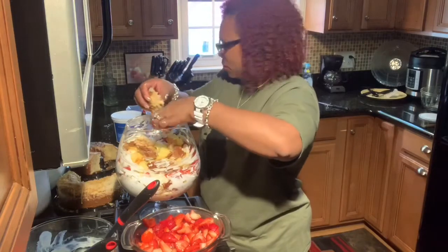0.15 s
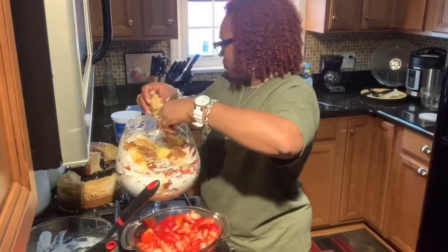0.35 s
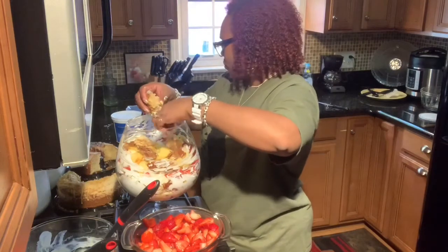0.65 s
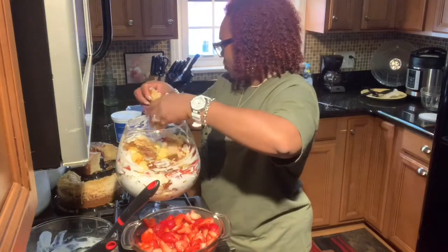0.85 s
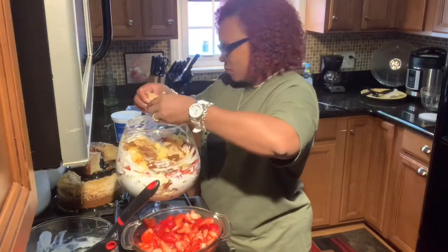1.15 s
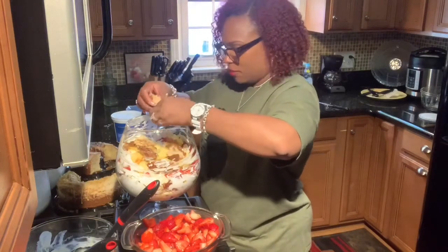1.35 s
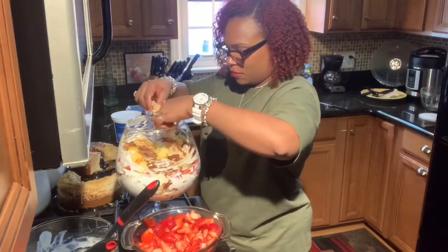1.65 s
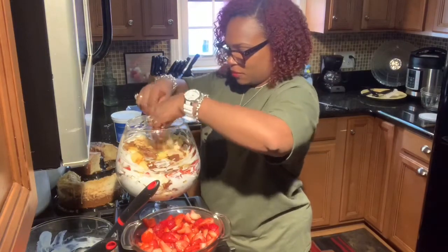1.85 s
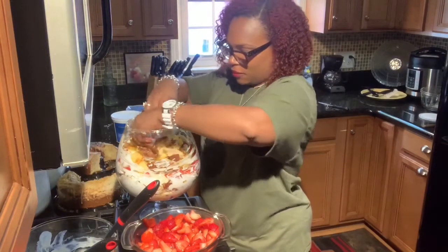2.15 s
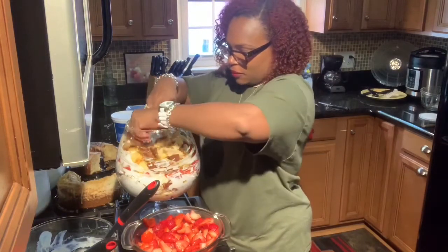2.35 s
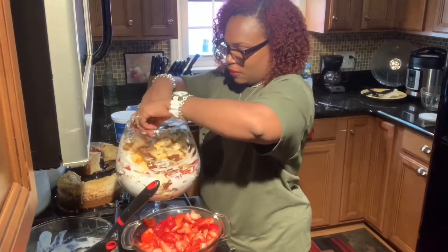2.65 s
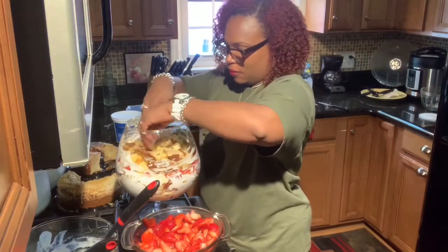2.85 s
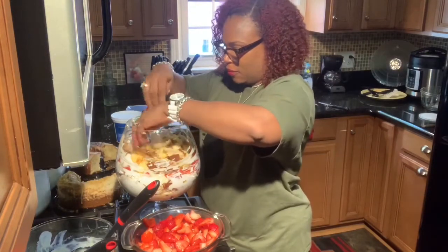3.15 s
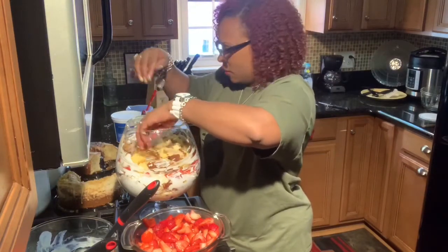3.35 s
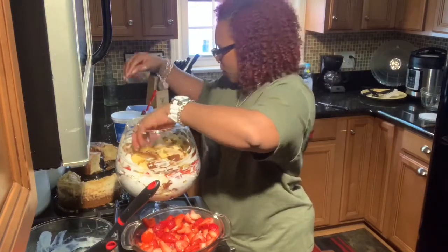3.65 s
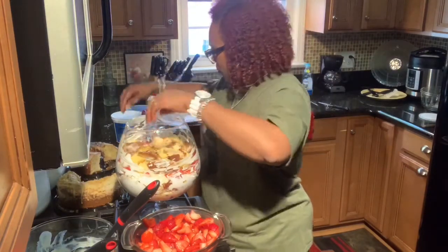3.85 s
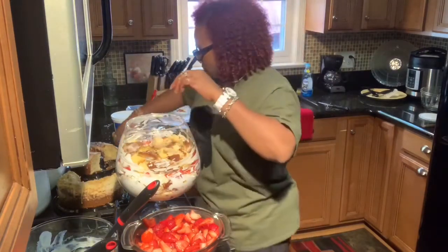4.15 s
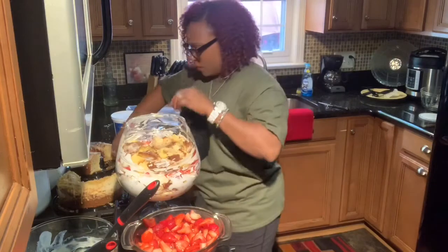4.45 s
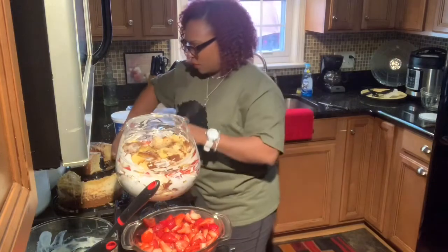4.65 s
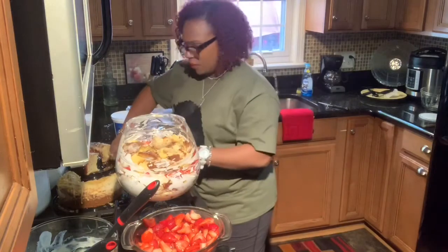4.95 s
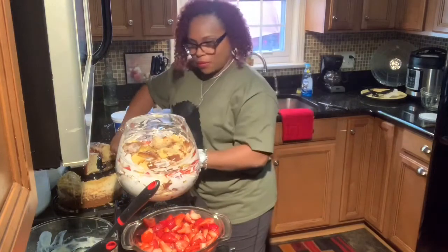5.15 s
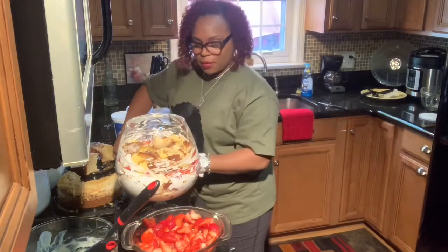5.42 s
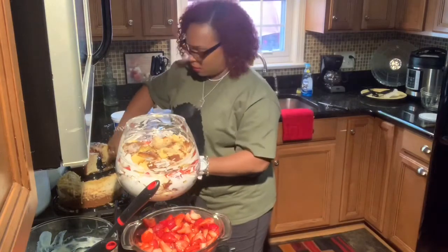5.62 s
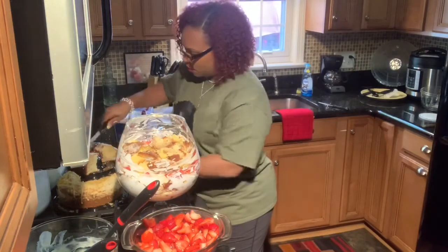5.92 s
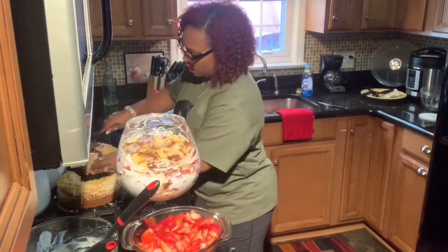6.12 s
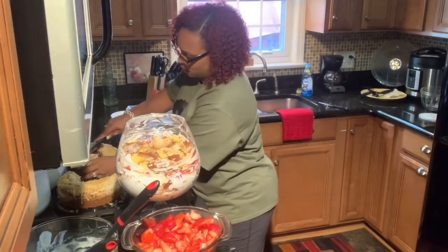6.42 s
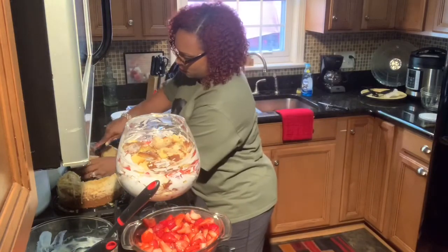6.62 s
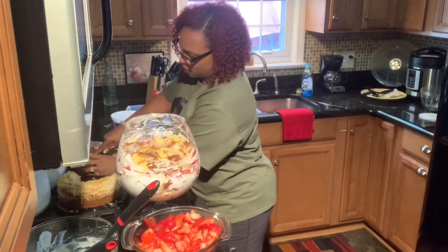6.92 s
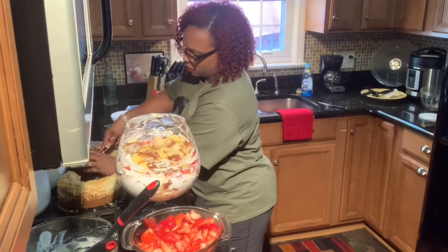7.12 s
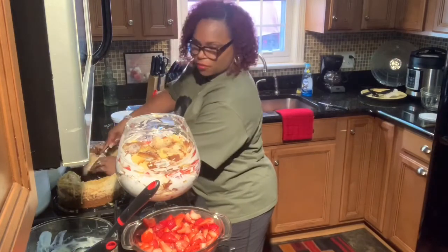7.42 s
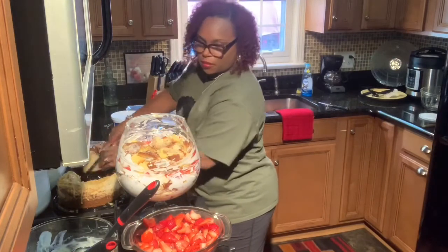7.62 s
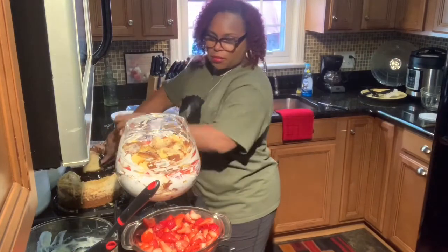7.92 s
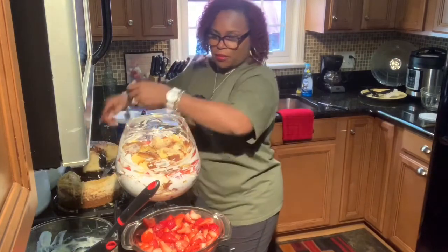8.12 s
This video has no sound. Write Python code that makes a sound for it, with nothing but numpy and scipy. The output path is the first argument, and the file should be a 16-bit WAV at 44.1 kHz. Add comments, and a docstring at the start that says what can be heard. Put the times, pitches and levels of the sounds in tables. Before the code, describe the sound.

In a small home kitchen, bracelet charms tinkle while hands crumble cake, followed by glassy clinks and firmer dish knocks above low fridge hum.

```python
"""Cake crumbled beside a jingling bracelet

Metal charms of a bracelet jingle as decaying sines over scuffs of noise, with a thin clasp tone beside them.
A utensil clinks on a glass bowl, then knocks on a cake dish and counter: filtered bursts excite ringing modes.
Cake, cloth and blade rub as grainy noise; chain and sleeve rustle faintly later on.
A refrigerator hums and rumbles on the right, under a dull room tone and a faint hiss."""
import sys
import numpy as np
from scipy import signal
from scipy.fft import rfft, irfft, next_fast_len
from scipy.io import wavfile

SR = 44100
rng = np.random.default_rng(int(sys.argv[2]) if len(sys.argv) > 2 else 0)


def output_pcm(signal):
    """Save a mono or channel-first signal as 16-bit PCM at the path in sys.argv[1].

    Samples are clipped to [-1, 1] before scaling.
    """
    pcm = np.clip(np.atleast_2d(signal).T, -1, 1) * 32767
    wavfile.write(sys.argv[1], SR, np.round(pcm).astype(np.int16))


N = 365148
TIME = np.arange(N) / SR
RING_TIME = TIME[:SR // 3]   # how long a hit is followed
EDGES = np.geomspace(90, 17000, 19)   # edges of the noise bands, Hz


def from_db(db):
    """Logarithmic level: decibels become an amplitude ratio."""
    return 10 ** (np.asarray(db) / 20)


def rms_one(x):
    """Power normalization: scale to rms 1."""
    return x / np.sqrt(np.mean(x ** 2) + 1e-20)


def early_level(x, size=882):
    """Onset energy: rms of the first samples of a stereo sound."""
    return np.sqrt(np.mean(x[..., :size] ** 2, axis=(0, -1), keepdims=True) + 1e-20)


def at_hz(points, hz):
    """Logarithmic pitch: interpolate a table on a log-frequency axis."""
    points = np.array(points)
    return np.interp(np.log(np.maximum(hz, 1)), np.log(points[:, 0]), points[:, 1])


def add(track, s, sound):
    """Superposition: mix a sound into a track at a time in seconds."""
    i = max(0, round(s * SR))
    track[..., i:i + sound.shape[-1]] += sound[..., :N - i]


def band(x, low, high, order=2):
    """Resonant selection: causal Butterworth band-pass."""
    sos = signal.butter(order, [low, min(high, .48 * SR)], "band", fs=SR, output="sos")
    return signal.sosfilt(sos, x)


def fade(t, t60):
    """Exponential damping: amplitude falls 60 dB in t60 seconds."""
    return np.exp(-np.log(1000) * t / t60)


def onset(t, rise_s):
    """Exponential build-up: amplitude approaches 1 with time constant rise_s."""
    return 1 - np.exp(-t / rise_s)


def drift(rate):
    """Random modulation: line segments between Gaussian knots, rate knots per second."""
    knots = rng.standard_normal(int(N / SR * rate) + 2)
    return np.interp(TIME * rate, np.arange(len(knots)), knots)


def flutter(count, size, rate):
    """Independent random modulation: rows of line segments, rate knots per second."""
    steps = np.arange(size) / SR * rate
    knots = rng.standard_normal((count, int(steps[-1]) + 2))
    return np.array([np.interp(steps, np.arange(len(row)), row) for row in knots])


def sparse_impulses(per_s):
    """Poisson-like events: random impulses with exponential strengths, capped at 3."""
    return (rng.random(N) < per_s / SR) * np.minimum(rng.exponential(1, N), 3)


def pair(white, alike):
    """Interaural coherence: mix two unrelated noises to a left and right of given likeness."""
    alike = np.clip(alike, 0, 1)
    mid = np.sqrt((1 + alike) / 2) * white[0]
    side = np.sqrt((1 - alike) / 2) * white[1]
    return np.array([mid + side, mid - side])


# left-right likeness of diffuse sound: (frequency [Hz], coherence [0 to 1])
LIKENESS = [(100, .98), (250, .92), (600, .65), (1500, .3), (4500, .3), (7000, .8), (8500, .99)]


def coloured(spectrum):
    """Spectral shaping: steady stereo noise of rms 1, weighted by a (frequency [Hz], level [dB]) table."""
    size = next_fast_len(N)
    hz = np.arange(size // 2 + 1) * SR / size
    white = rfft(rng.standard_normal((2, size)))
    shaped = pair(white, at_hz(LIKENESS, hz)) * from_db(at_hz(spectrum, hz))
    return rms_one(irfft(shaped, size)[:, :N])


# reverberation of the kitchen: (frequency [Hz], t60 [s])
ROOM_T60 = [(100, 0.17), (600, 0.33), (2000, 0.34), (6000, 0.26), (14000, 0.16)]


def kitchen(x, gap_s=0.0086):
    """Diffuse reverberation: reflections from cabinets and tiles, with a decay time for each band."""
    t, echo = RING_TIME, 0
    for low, high in zip(EDGES, EDGES[1:]):
        hz = np.sqrt(low * high)
        noise = pair(rng.standard_normal((2, len(t))), at_hz(LIKENESS, hz))
        echo = echo + band(noise * fade(t, at_hz(ROOM_T60, hz)) * (t > gap_s), low, high)
    echo = echo / np.sqrt(np.sum(echo ** 2) / 2)
    return signal.fftconvolve(x[None], echo, axes=1)[:, :N]


def rattling_tone(hz, t, rattle_per_s=220, wobble_rad=.55):
    """Phase modulation: a piece rattling on its link blurs its spectral line."""
    wobble = wobble_rad * flutter(count=1, size=len(t), rate=rattle_per_s)[0]
    return np.sin(2 * np.pi * hz * t + wobble)


# touches of the charms: (time [s], then relative levels [dB] of flat charm, long charm, small charm,
# link and contact scuff)
JINGLES = [(0.002, -61.5, -75, -68, -87, -74), (0.309, -37, -64, -88, -78, -59.5),
           (0.318, -40.5, -72, -78, -85, -68), (0.432, -51, -61, -70, -52, -75.5),
           (0.744, -64, -71, -83, -71, -69), (1.103, -65, -67.5, -65, -70, -75),
           (1.128, -49, -65, -73, -69, -67), (1.464, -54, -55, -66, -79, -72.5),
           (1.579, -50, -75, -73, -75, -69.5), (1.846, -49, -54, -67, -57, -65.5),
           (2.028, -67, -88.5, -93, -94, -86), (3.302, -40, -65, -88, -81, -62.5),
           (3.446, -53, -81, -60, -93, -72.5), (3.63, -60, -96, -83, -90, -75.5),
           (4.184, -50, -62, -86, -59, -65.5), (4.478, -52, -69, -48, -98, -67),
           (4.65, -76, -75, -62, -71, -72), (4.747, -66, -73, -76, -67, -72.5),
           (5.009, -76.5, -81, -85, -75, -100), (5.276, -54, -74, -69, -53, -81),
           (5.438, -79, -74, -55, -77, -74), (5.641, -56, -51, -88, -77, -56.5),
           (5.66, -49, -52, -88, -62, -61), (5.846, -88, -97, -68, -83, -83),
           (5.887, -70, -86, -59, -72, -80), (5.917, -57, -62.5, -47, -67, -71.5),
           (6.01, -66.5, -86, -60, -79, -72.5), (6.077, -57, -76, -65, -82, -81),
           (6.126, -53.5, -62.5, -54, -61, -68.5), (6.281, -66.5, -82, -66, -94, -79),
           (6.541, -65, -74, -61, -70, -69), (6.61, -63, -77, -65, -57, -71),
           (6.737, -60, -71, -55, -88, -67.5), (6.942, -64.5, -71, -69, -58, -70),
           (7.268, -54.5, -68, -59, -65, -69), (7.797, -58, -81, -78, -84, -57),
           (8.115, -84, -92, -72, -69, -82), (8.221, -85, -89, -63, -91, -76)]
# modes of each piece of the bracelet: (frequency [Hz], relative level [dB], t60 [s])
FLAT_CHARM = [(3946, -31, .08), (6950, -7, .06), (7002, -.5, .1), (8545, -8, .07), (14250, -4.5, .11)]
LONG_CHARM = [(3965, -17, .07), (4059, -15, .085), (9685, 0, .24)]
SMALL_CHARM = [(6790, -15, .1), (8300, -11, .07), (8530, -7, .07), (14490, -1, .12), (14680, -7, .09)]
LINK = [(15638, 0, .2)]
# bands of the contact noise, Hz
SCUFF_HZ, CLICK_HZ, TICK_HZ = (3600, 6500), (1300, 3600), (8000, 13500)
WRIST_PLACES = 6   # the moving wrist meets different reflections from touch to touch


def bracelet(ring_db=9.0, room_db=-3.0, vary_db=0.5, rise_s=0.0005, chatter_db=-13.0,
             scuff_db=16.0, click_db=12.5, tick_db=16.5, contact_t60=0.077):
    """Modal ringing: each touch excites damped sines and contact noise, then one soft bounce."""
    places, t = np.zeros((WRIST_PLACES, N)), RING_TIME
    pieces = (FLAT_CHARM, LONG_CHARM, SMALL_CHARM, LINK)
    for k, (s, *levels_db, contact_db) in enumerate(JINGLES):
        clink = 0
        for level_db, modes in zip(levels_db, pieces):
            for hz, mode_db, t60 in modes:
                gain = from_db(level_db + mode_db + ring_db + vary_db * rng.standard_normal())
                clink = clink + gain * fade(t, t60) * rattling_tone(hz, t)
        contact = from_db(contact_db) * rng.standard_normal(len(t)) * fade(t, contact_t60)
        clink = clink + from_db(scuff_db) * band(contact, *SCUFF_HZ, order=3)
        clink = clink + from_db(click_db) * band(contact, *CLICK_HZ)
        clink = clink + from_db(tick_db) * band(contact, *TICK_HZ)
        clink = clink * onset(t, rise_s)
        place = places[k % WRIST_PLACES]
        add(place, s, clink)
        add(place, s + rng.uniform(0.0074, 0.026), from_db(chatter_db) * clink)
    return sum(place + from_db(room_db) * kitchen(place) for place in places)


# ringing of the swinging clasp: (time [s], relative level [dB], t60 [s])
CLASP_RINGS = [(0.432, -69, .17), (1.13, -67, .14), (1.846, -69, .2), (4.205, -61.5, 0.66),
               (4.48, -71, 0.62), (4.83, -73, 0.73), (5.45, -62.5, 0.16), (5.661, -51, .19),
               (5.95, -71, 0.18), (6.13, -48, 0.14), (6.96, -65, .3), (7.28, -64, 0.21)]
CLASP_HZ = 4735


def clasp(level_db=1.5, room_db=-6.0, rise_s=.004):
    """Single-mode resonance: one thin, glassy tone wavers as the clasp swings."""
    out, t = np.zeros(N), TIME[:SR]
    for s, db, t60 in CLASP_RINGS:
        envelope = fade(t, t60) * onset(t, rise_s)
        add(out, s, from_db(db + level_db) * envelope * rattling_tone(CLASP_HZ, t))
    return out + from_db(room_db) * kitchen(out)


# colour shared by all blows: (frequency [Hz], relative level [dB])
BLOW_COLOUR = [(110, 2.5), (170, 5), (300, 0.5), (600, 0.5), (1000, -5), (2200, -1.83), (4500, -4.5),
               (11500, -3)]
BASS_CORNER_HZ = 1140   # a blow of zero heft thins out below this
BASS_SLOPE_DB, TREBLE_SLOPE_DB = 11, 20   # fall per octave beyond the two corners


def blow_db(blows, hz, per_hz):
    """Contact spectrum: heft extends the bass, a short contact extends the treble; per_hz tilts the level."""
    _, strength_db, heft, contact_ms = np.transpose(blows)[:4]
    bass_hz = BASS_CORNER_HZ / 2 ** heft
    treble_hz = 1000 / np.maximum(contact_ms, .02)
    # smooth count of octaves beyond each corner
    below, above = np.log2(1 + np.array([bass_hz / hz, hz / treble_hz]) ** 4) / 4
    level_db = strength_db + at_hz(BLOW_COLOUR, hz) - per_hz * 10 * np.log10(hz)
    return level_db - BASS_SLOPE_DB * below - TREBLE_SLOPE_DB * above


# decay of the struck things: (frequency [Hz], t60 [s])
BODY_T60 = [(100, 0.057), (600, 0.11), (2000, 0.18), (6000, 0.0042), (14000, 0.01054)]
CRACK_T60_S, REBOUND_DB = .025, 2.0   # first crack of a hard contact; unevenness of the rebounds


def knocks(blows, level_db, room_db, rise_s, crack_db):
    """Statistical modal density: crowded short-lived modes sound as noise bands, each with its own decay."""
    t, sounds = RING_TIME, 0
    white = rng.standard_normal((len(blows), 2, 2, len(t))).transpose(1, 2, 0, 3)
    # rebounds and early echoes
    white = white * from_db(REBOUND_DB * flutter(count=len(blows), size=len(t), rate=290))
    for k, (low, high) in enumerate(zip(EDGES, EDGES[1:])):
        hz = np.sqrt(low * high)
        body = fade(t, at_hz(BODY_T60, hz))
        room = from_db(room_db) * fade(t, at_hz(ROOM_T60, hz))
        dying = np.hypot(body, room) + from_db(crack_db) * fade(t, CRACK_T60_S)
        noise = pair(white[k % 2], at_hz(LIKENESS, hz))
        shake = band(noise * dying * onset(t, rise_s), low, high)
        gain = from_db(blow_db(blows, hz, 0.99) + level_db) * np.sqrt(high - low)
        sounds = sounds + shake * (gain[:, None] / early_level(shake))
    out = np.zeros((2, N))
    for k, row in enumerate(blows):
        add(out, row[0], sounds[:, k])
    return band(out, 103, 14000)


def ring_modes(blows, modes, level_db, vary_db, room_db):
    """Modal synthesis: blows ring clear damped sines, with a random strength and sign every time."""
    out, t = np.zeros(N), RING_TIME
    chance = rng.standard_normal((len(blows), len(modes), 2))
    rings = np.array([fade(t, t60) * np.sin(2 * np.pi * hz * t) for hz, _, t60 in modes])
    strengths_db = np.transpose([blow_db(blows, hz, 0) + mode_db for hz, mode_db, _ in modes])
    gains = from_db(strengths_db + level_db + vary_db * chance[..., 0]) * np.sign(chance[..., 1])
    for row, gain in zip(blows, gains):
        add(out, row[0], gain @ rings)
    return out + from_db(room_db) * kitchen(out)


# utensil on glass bowl: (time [s], relative strength [dB], heft [octaves of bass], contact time [ms])
BOWL_CLINKS = [(2.109, -44.5, 0.06, 0.096), (2.117, -32.5, -1, 0.31), (2.188, -28.5, -1.21, 0.098),
               (2.322, -44, -2, 0.031)]
# bowl modes, in close pairs and clusters: (frequency [Hz], relative level [dB], t60 [s])
BOWL = [(1211, -3, .2), (1935, -3, .12), (1975, -5, .11), (2640, -5, .14), (2760, -14, .11),
        (3020, -11, .15), (3431, -8, .11), (3560, -9, .15), (3601, -6.5, .14), (3718, -7.5, .12),
        (3967, -5, .15), (4323, -11, .14), (4490, -15, .2), (4613, -12, .12), (5300, -10, .11),
        (5401, -10, .1), (5475, -10, .15), (5670, -9, .12), (6013, -13, .15), (6207, -14, .15),
        (6794, -13, .17)]


def glass_bowl():
    """Impact excitation: steel on glass speaks at once and rings closely spaced, beating modes."""
    contact = knocks(BOWL_CLINKS, level_db=-2.5, room_db=-4.0, rise_s=.0008, crack_db=-2.5)
    return contact + ring_modes(BOWL_CLINKS, BOWL, level_db=-1.3, vary_db=-2.5, room_db=-8.5)


# the dish is dragged over the counter: limits in s; one slip (relative strength dB, heft octaves, contact ms)
DRAG_S, SLIP, SLIPS_PER_S = (7.63, 7.745), (-49.5, -.3, 0.34), 65


def drag():
    """Stick-slip friction: uneven small slips as blows of (time, strength, heft, contact time)."""
    times = DRAG_S[0] + np.cumsum(rng.uniform(.3, 1.7, 40)) / SLIPS_PER_S
    return [(s, *SLIP) for s in times if s < DRAG_S[1]]


# utensil on dish and counter: (time [s], relative strength [dB], heft [octaves of bass],
# contact time [ms], added dish ring [dB], relative counter thud [dB])
KNOCKS = [(0.865, -61.5, -0.5, 0.13, -20, -89.5), (3.591, -59, -1, 0.094, -15, -94.5),
          (3.698, -58.5, -1, 0.19, -2, -92), (4.278, -53.5, 0, 0.077, -2, -77.5),
          (4.34, -48.5, 0.4, 0.072, -6.5, -78), (4.604, -36.5, 1, 0.099, -6.5, -46),
          (4.608, -35.5, 1.1, 1.3, 3.5, -57), (4.928, -58, 2.5, 0.067, -6, -57),
          (5.2, -29.5, -1.5, 0.22, 2, -49.5), (5.209, -34, -.5, 0.18, -1.5, -56),
          (5.367, -52, 1, 0.099, -8, -66), (5.402, -52, 0.5, 0.067, -3, -83),
          (6.54, -47.5, .5, 0.22, 0, -68), (6.571, -29, 0.7, 0.27, -1.5, -37.5),
          (6.584, -27.5, -1.44, 0.35, 3.5, -54), (6.643, -35, 1.13, 0.85, -1.5, -48),
          (6.68, -36.5, 0.5, 0.5, -8, -60), (6.883, -26, -0.52, 1.2, 0, -67),
          (6.961, -39.5, .5, 0.58, -8, -67), (7.374, -32.5, -0.78, 0.53, 3, -52.5),
          (7.399, -27, 0.01, 0.25, -2, -37.5), (7.573, -31, 2.5, 0.92, 2, -36.5),
          (7.612, -39, 1.5, 1.2, 2, -48), (7.706, -45.5, 1, 0.56, -4, -63), (7.753, -42, 2, 0.7, -6.5, -47),
          (7.796, -35.5, 3.5, 0.16, -1.5, -30), (7.892, -39, 3, 0.82, 5, -50),
          (7.961, -42, 3, 0.78, -1, -40.5)]
# modes of the dish on the counter: (frequency [Hz], relative level [dB], t60 [s])
DISH = [(429.6, -11.5, 0.16), (519, -7.5, 0.056), (577.4, -6, 0.12), (637, -5, 0.13), (704, -11, 0.11),
        (827, -12, 0.33), (1224, -10.5, 0.11), (1498, -10.5, 0.085), (1653, -3.5, 0.066),
        (1844, -7.5, 0.091), (2123, -4, 0.048), (2474, -6.5, 0.072), (2713, -8.5, 0.11), (3025, -20, 0.13),
        (4180, -20, 0.26), (4470, -16.5, 0.14), (4670, -13, 0.15)]


def cake_dish():
    """Impact excitation: utensil knocks and dragging slips ring the modes of the dish."""
    contact = knocks(KNOCKS, level_db=-3.5, room_db=-5.5, rise_s=0.00099, crack_db=-21.0)
    ringing = [(s, db + ring_db, heft, contact_ms) for s, db, heft, contact_ms, ring_db, _ in KNOCKS]
    return contact + ring_modes(ringing + drag(), DISH, level_db=4.5, vary_db=2.0, room_db=-9.0)


# modes of the counter: (frequency [Hz], relative level [dB], t60 [s])
COUNTER = [(154, 3.5, 0.13), (192, 3.5, 0.08), (236, -6, 0.18), (269, -4.5, 0.12), (356, 3, 0.12)]


def counter(level_db=-2.5, room_db=-7.5, rise_s=0.0032):
    """Panel resonance: the weight behind a knock excites low damped modes of the counter."""
    out, t = np.zeros(N), RING_TIME
    for s, *_, thud_db in KNOCKS:
        thud = 0
        for hz, db, t60 in COUNTER:
            tone = np.sin(2 * np.pi * (hz * t + rng.random()))
            thud = thud + from_db(db) * fade(t, t60) * tone
        add(out, s, from_db(thud_db + level_db) * thud * onset(t, rise_s))
    return out + from_db(room_db) * kitchen(out)


# rubbing of cake, cloth and blade: (time of the middle [s], Gaussian half-width [s],
# relative level [dB], centre [Hz], reach to either side [octaves])
RUBS = [(0.02, 0.12, -59, 347, 0.47), (1.16, 0.046, -57, 5600, 0.36), (2.83, 0.13, -54, 210, 0.97),
        (3.889, 0.072, -74, 3300, 0.61), (3.989, 0.077, -55, 213, 0.83), (4.304, 0.046, -61, 2980, 0.71),
        (4.8, 0.22, -65, 1390, 0.56), (4.917, 0.13, -55, 434, 0.74), (5.39, 0.1, -58, 2140, 0.9),
        (6.793, 0.047, -59, 1420, 0.8), (7.143, 0.18, -62.5, 1170, 0.93), (7.675, 0.063, -42.5, 1640, 0.44),
        (7.696, 0.063, -45.5, 626, 0.13), (7.898, 0.1, -53, 1690, 1.18)]


def rubbing(grain_db=-1.0, snags_per_s=35, snag_db=-11.5, snag_t60=0.3, level_db=-2.0):
    """Frictional noise: strokes swell and fade, with grain from tiny slips and crackle from small snags."""
    out, t = np.zeros((2, N)), TIME[:SR]
    snags = signal.fftconvolve(sparse_impulses(snags_per_s), fade(t, snag_t60))[:N]
    slips = from_db(grain_db * drift(160)) + from_db(snag_db) * snags
    for s, length, stroke_db, hz, octaves in RUBS:
        start = max(0, s - .5)
        noise = pair(rng.standard_normal((2, len(t))), at_hz(LIKENESS, hz))
        noise = noise * slips.take(int(start * SR) + np.arange(len(t)), mode="wrap")
        friction = rms_one(band(noise, hz / 2 ** octaves, hz * 2 ** octaves))
        swell = np.exp(-((start + t - s) / length) ** 2)
        add(out, start, from_db(stroke_db + level_db) * friction * swell)
    return out


# rustle as the arm works: (time [s], relative level [dB])
RUSTLE_LEVEL = [(4.0, -80), (4.15, -84.5), (4.33, -67), (4.49, -74.5), (5.02, -80.5), (5.41, -77.5),
                (5.73, -102), (6.11, -83), (6.29, -93.5), (6.57, -81), (6.72, -72.5), (7.03, -80.5),
                (7.48, -73.5), (7.74, -65.5), (7.978, -87), (8.28, -90)]
# spectrum of the rustle: (frequency [Hz], relative density [dB per Hz])
RUSTLE = [(300, -39), (1000, 1.5), (2500, 1.5), (6000, 0), (11000, -7.5), (14000, -10.5), (16000, -43)]
CATCH_DB, CATCH_T60, CLUMP_DB = 3, .02, 4   # links tick, each dying in CATCH_T60 s, above a clumpy rustle


def rustle(level_db=4.5, grain_db=-1.5, rise_s=0.097, catches_per_s=55):
    """Granular friction: once the arm is lowered, chain and sleeve slide in clumps and single links catch."""
    s, db = np.transpose(RUSTLE_LEVEL)
    grains = from_db(grain_db * drift(400) + CLUMP_DB * drift(22))
    catches = sparse_impulses(catches_per_s) + 1e-18
    catches = signal.lfilter([1], [1, -fade(1 / SR, CATCH_T60)], catches)
    grains = grains + from_db(CATCH_DB) * catches
    moving = np.clip((TIME - s[0]) / rise_s, 0, 1) * from_db(np.interp(TIME, s, db) + level_db)
    return moving * grains * coloured(RUSTLE)


# left-right phase at the two microphone ports: (frequency [Hz], lead of the left [rad])
PORT_PHASE = [(60, -.2), (200, .6), (600, 1.4), (1300, 1.2), (2100, 2.6), (2700, 2.2), (3900, -.5),
              (7000, -2.3), (8555, -3.14), (9685, -4.08), (14250, -7.7), (15640, -8.9)]
# left-right level at the two ports: (frequency [Hz], left minus right [dB])
BALANCE = [(60, -3), (200, -2), (350, 3), (1200, 4.5), (2500, 2.5), (4700, 3.5), (7500, 0), (15000, 0)]


def ports(x):
    """Interchannel difference: two microphone ports differ in phase and level across frequency."""
    size = next_fast_len(N + SR // 10)
    hz, sides = np.arange(size // 2 + 1) * SR / size, np.array([[.5], [-.5]])
    level = from_db(sides * at_hz(BALANCE, hz))
    phase = np.exp(1j * sides * at_hz(PORT_PHASE, hz))
    return irfft(rfft(x, size) * level * phase, size)[:, :N]


# shared swell of the refrigerator's hum and rumble: (time [s], level change [dB])
HUM_LEVEL = [(0, 2.5), (2.0, -5), (2.9, 1.5), (3.15, -8.5), (3.5, 0), (6.7, 2.5), (8.2, 0)]
# spectrum of the room tone: (frequency [Hz], relative density [dB per Hz])
ROOM_TONE = [(30, -37.5), (75, -4.5), (115, -2.5), (150, -8.5), (210, -12), (250, -3.5), (330, -10.5),
             (480, -13), (700, -20), (1050, -26), (1500, -25.5), (1800, -30), (3200, -43), (12000, -82)]
# spectra of rumble and hiss: (frequency [Hz], relative density [dB per Hz])
RUMBLE = [(10, -38.5), (25, -35.0), (42, -17), (58, -3.0), (75, -11.0), (110, -17.5), (300, -52.5), (1000, -120)]
HISS = [(2000, 7.5), (5000, -1), (14000, -8.5), (15800, -21)]
HUM_HZ, HUM_DB, RUMBLE_DB = 58.9, -57.5, -59.5   # levels before the shared swell and panning
ROOM_TONE_DB, HISS_DB = -60, -82
FRIDGE_LAG_S = .00056   # hum, rumble and room tone reach the left port this much later


def background(waver_db=2.5, wander_rad=0.95, breathe_db=1.5):
    """Tonal and broadband noise: the refrigerator hums and rumbles on the right, under room tone and hiss."""
    hum = np.sqrt(2) * np.sin(2 * np.pi * HUM_HZ * TIME + wander_rad * drift(3.3))
    hum = hum * from_db(HUM_DB + waver_db * drift(4))
    rumble = from_db(RUMBLE_DB) * coloured(RUMBLE)
    swell = from_db(np.interp(TIME, *np.transpose(HUM_LEVEL)))
    fridge = (hum + rumble) * swell * from_db([[-1.8], [1.8]])
    tone = from_db(ROOM_TONE_DB + breathe_db * drift(12.0)) * coloured(ROOM_TONE)
    left, right = fridge + tone * from_db([[-.3], [.3]])
    left = np.interp(TIME - FRIDGE_LAG_S, TIME, left)
    return np.array([left, right]) + from_db(HISS_DB) * coloured(HISS)


def scene():
    """Superposition: work at the counter over the kitchen's background."""
    struck = glass_bowl() + cake_dish() + counter()
    return ports(bracelet() + clasp() + struck + rubbing() + rustle()) + background()


def record(dry):
    """Low-pass filtering: an elliptic filter cuts the top steeply at 15.9 kHz."""
    return signal.sosfilt(signal.ellip(10, .1, 80, 15900, fs=SR, output="sos"), dry)


dry = scene()
out = record(dry)
output_pcm(out)
```